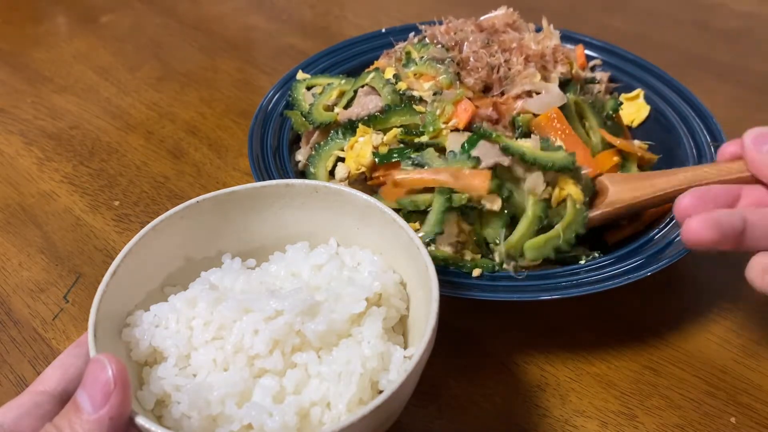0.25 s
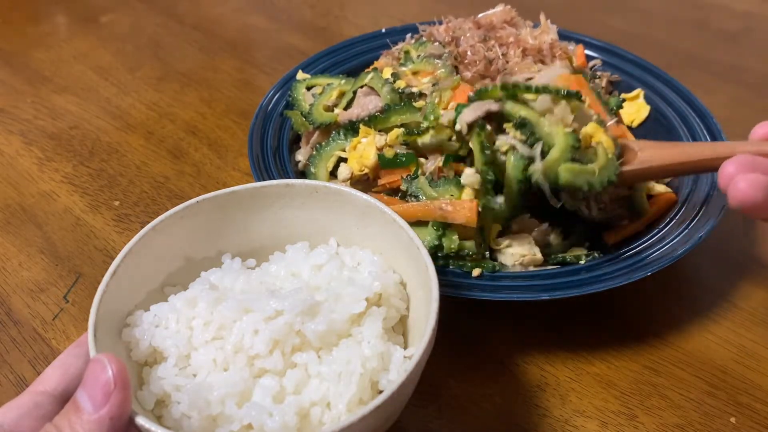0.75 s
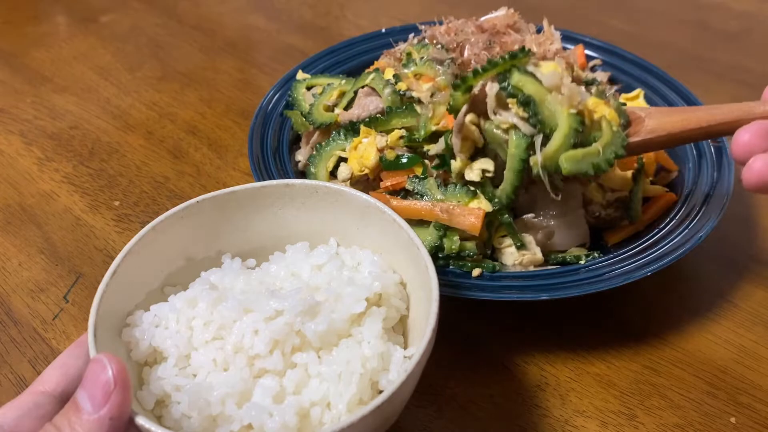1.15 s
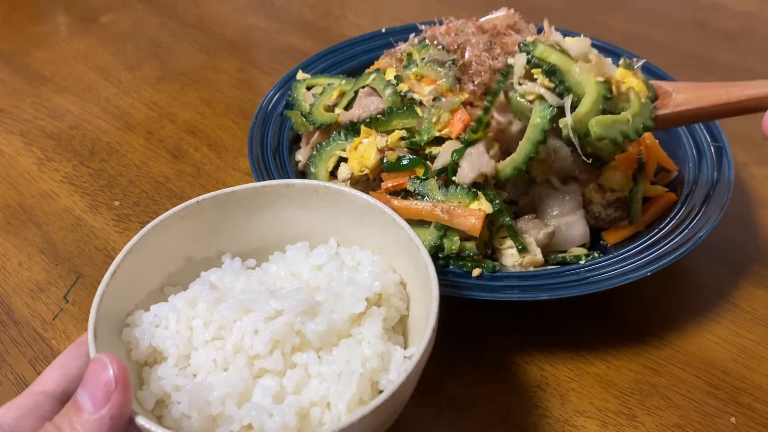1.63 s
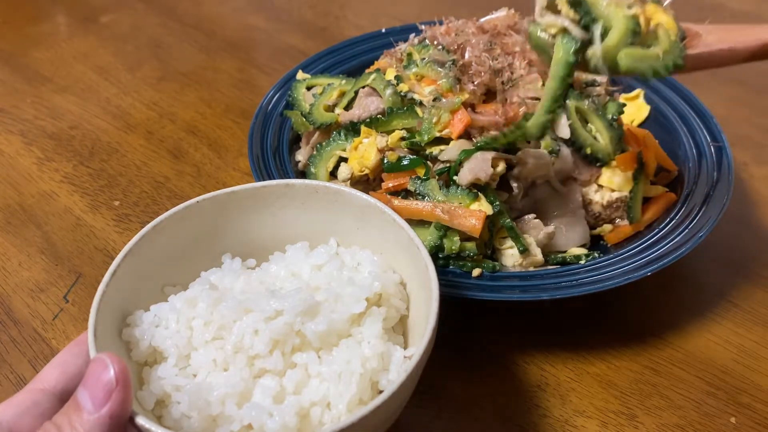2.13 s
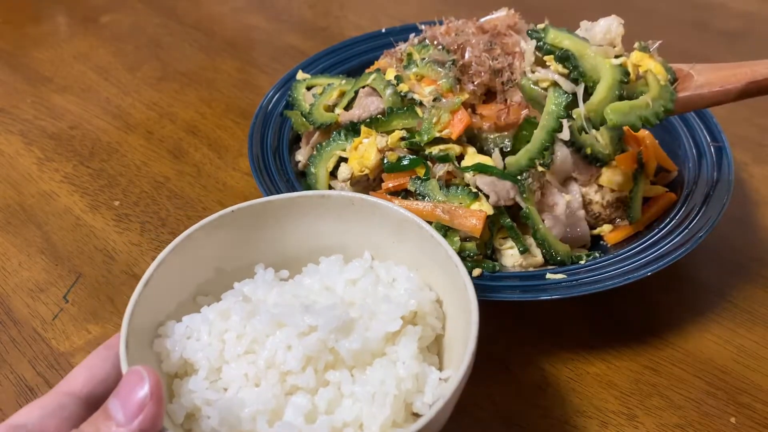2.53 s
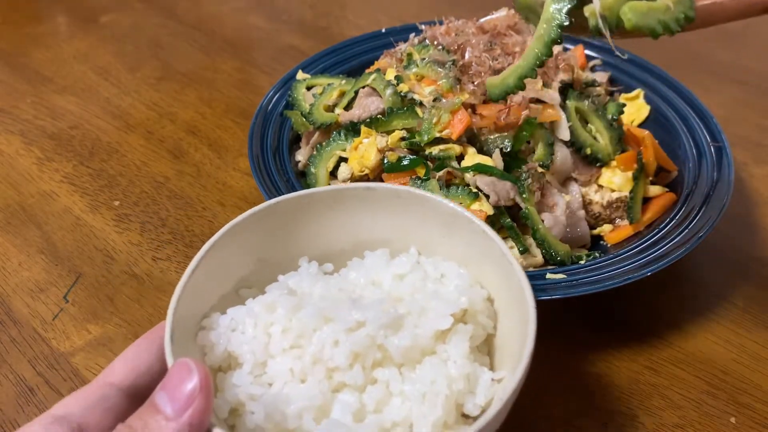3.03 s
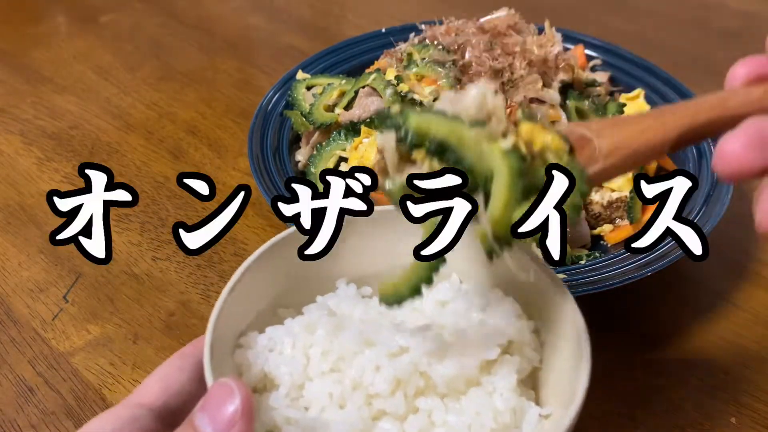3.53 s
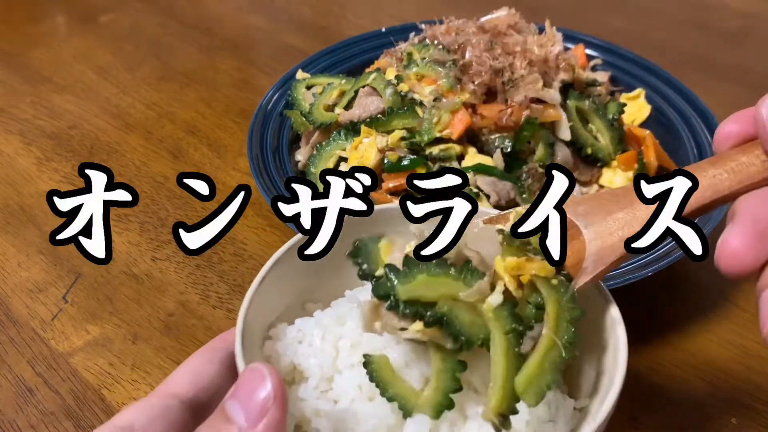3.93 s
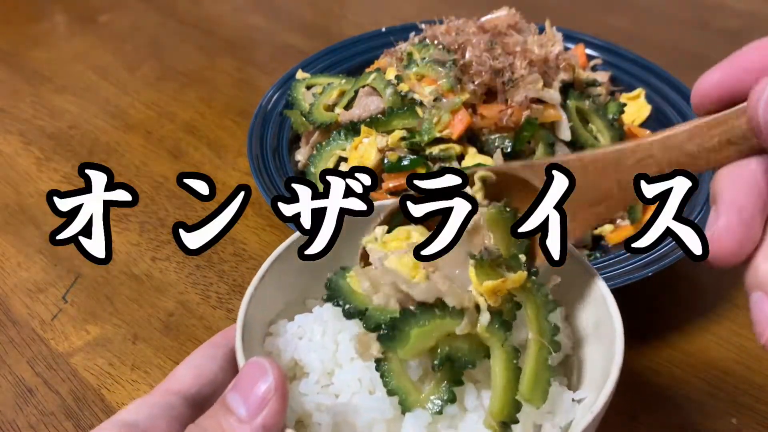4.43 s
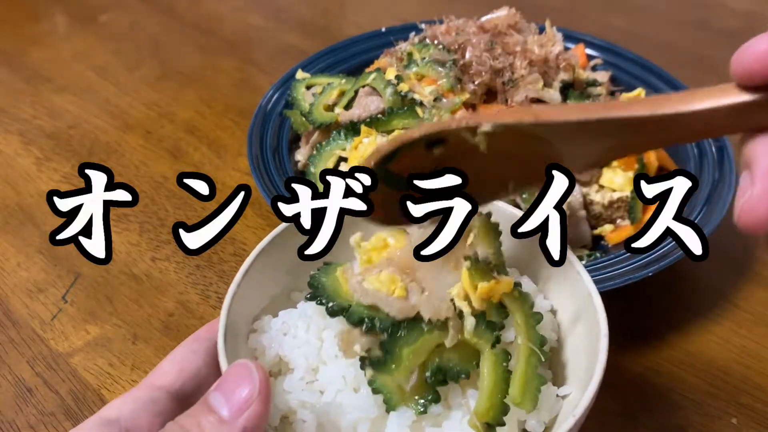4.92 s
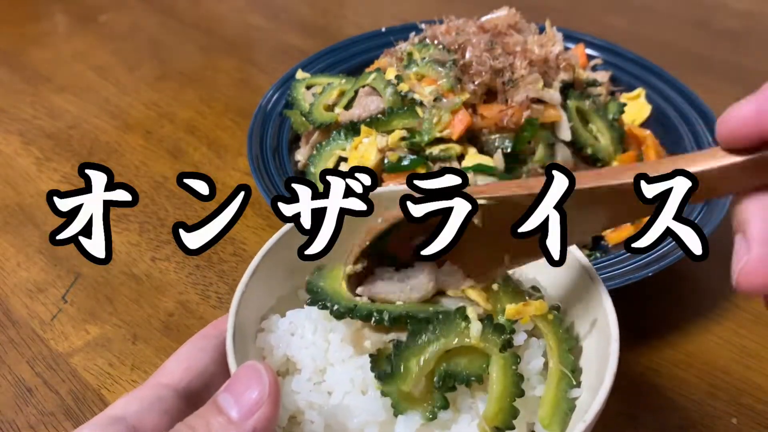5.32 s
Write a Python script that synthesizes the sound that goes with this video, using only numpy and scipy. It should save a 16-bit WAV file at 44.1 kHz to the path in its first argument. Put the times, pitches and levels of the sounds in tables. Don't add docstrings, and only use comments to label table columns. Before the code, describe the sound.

Close, quiet kitchen handling: tiny wet snaps, dull table thumps, a bowl foot dragging on wood, and one sharp ceramic knock.

```python
import sys
import numpy as np
from scipy import signal
from scipy.fft import rfft, irfft, next_fast_len
from scipy.io import wavfile

SR = 44100
rng = np.random.default_rng(int(sys.argv[2]) if len(sys.argv) > 2 else 0)


def dump(signal):
    limited = np.clip(np.atleast_2d(signal).T, -1, 1)
    pcm = np.round(limited * 32767).astype(np.int16)
    wavfile.write(sys.argv[1], SR, pcm)


def how_loud(loudness_db):
    steps = np.asarray(loudness_db, float) / 20
    return 10 ** steps


N = 245637

# (time [s], peak [dB], frequency [Hz], t60 [s], rise [s])
TABLE_THUMPS = [(0.09, -41, 88, 0.055, 0.0072), (0.158, -33, 120, 0.064, 0.013),
                (0.191, -37, 136.4, 0.096, 0.0087), (0.318, -44.5, 129.7, 0.19, 0.0037),
                (0.812, -36.5, 125.7, 0.21, 0.0022), (0.848, -39, 147, 0.047, 0.0038),
                (1.038, -43, 67.6, 0.15, 0.037), (1.3815, -36.5, 109.9, 0.21, 0.015),
                (1.39, -35.5, 76.7, 0.21, 0.027), (1.738, -47.5, 137.5, 0.088, 0.014),
                (2.097, -46.5, 124, 0.061, 0.0055), (2.213, -37.5, 87.5, 0.22, 0.011),
                (2.253, -33, 83, 0.15, 0.0037), (2.873, -39, 115, 0.068, 0.0049),
                (3.308, -44.5, 117, 0.085, 0.019), (4.105, -33.5, 135.8, 0.22, 0.0039),
                (4.649, -47.5, 68, 0.48, 0.021)]


def rms_one(x):
    return x / np.sqrt(np.mean(x ** 2) + 1e-20)


def in_time(rows):
    s, *columns = np.transpose(rows)
    return [np.interp(np.arange(N) / SR, s, c) for c in columns]


def at_hz(points, hz):
    table_hz, values = np.transpose(points)
    return np.interp(np.log(hz), np.log(table_hz), values)


def drift(rate):
    r = np.exp(-80 * np.pi * rate / SR)
    slow = signal.lfilter([1], [1, -2 * r, r * r], rng.standard_normal(N // 40 + 2002))[2000:]
    return np.interp(np.arange(N) / 40, np.arange(len(slow)), rms_one(slow))


def ring(drive, hz, t60):
    r = how_loud(-60 / (max(t60, 0.0005) * SR))
    w = 2 * np.pi * hz / SR
    return signal.lfilter([0, np.sin(w)], [1, -2 * r * np.cos(w), r * r], drive + 1e-18)


def band(x, low_hz, high_hz):
    return signal.sosfilt(signal.butter(2, [low_hz, high_hz], "band", fs=SR, output="sos"), x)


def sides(lean):
    return np.array([[1 + lean], [1 - lean]])


def pair(low_hz, high_hz, white):
    # (frequency [Hz], correlation [0-1])
    likeness = [(60, 0.98), (200, 0.85), (500, 0), (1500, 0.56), (3000, 0.4), (5500, 0.2), (7500, 0.94),
                (15000, 0.92)]
    mid, side = band(white, low_hz, high_hz)
    alike = np.clip(at_hz(likeness, np.sqrt(low_hz * high_hz)), 0, 1)
    return np.sqrt(1 + alike) * mid + np.sqrt(1 - alike) * side * [[1], [-1]]


def add(out, s, sound):
    i = round(s * SR)
    out[..., i:i + sound.shape[-1]] += sound[..., :N - i]


def room_tone(patchy_db):
    # (frequency [Hz], density [dB per Hz])
    air_spectrum = [(15, -40), (30, -7), (54, -2), (124, -4.5), (258, -22), (312, -15.5), (367, -25.5),
                    (617, -25.5), (711, -20), (859, -29), (1600, -38), (2600, -41.5), (2900, -51),
                    (7000, -51), (9100, -68), (15400, -120)]
    # (time [s], level [dB])
    ebb = [(0, 1.5), (.9, .6), (1.3, -1), (1.6, .3), (2, -1.5), (3.6, -1.5), (4.1, 0), (4.9, -2),
           (5.57, -2.5)]
    out = 0
    edges = 31 * 2 ** np.arange(0, 9, 0.5)
    white = rng.standard_normal((2, 2, N))
    slow_db = in_time(ebb)[0] + 0.3 * drift(0.11)
    for k, (low, high) in enumerate(zip(edges, edges[1:])):
        flicker_db = slow_db + patchy_db * drift(9)
        level_db = at_hz(air_spectrum, np.sqrt(low * high))
        out = out + how_loud(level_db + flicker_db) * pair(low, high, white[k % 2])
    whirr_hz, half_width_hz = 2690, 36
    whirr = rms_one(pair(whirr_hz - half_width_hz, whirr_hz + half_width_hz, white[0]))
    return how_loud(-58) * rms_one(out) + how_loud(-89) * whirr


def rumble():
    # (time [s], level [dB], creak above the deep shudder [dB])
    load = [(0.0, -54.5, 0.5), (0.22, -63.5, 1), (0.62, -66, 0), (.9, -61.5, 0.1), (1.25, -67.5, -4.5),
            (1.61, -64.5, 7), (1.77, -64, 6.5), (2.0, -59, -9), (2.28, -49, 2.2), (2.64, -70, 1.5),
            (2.96, -47, 6), (3.4, -58, -4.5), (3.6, -57, -0.5), (3.85, -67.5, 0.5), (4.69, -58.5, 0.8),
            (5.04, -73, -1), (5.23, -59.5, -5), (5.57, -65, 0.1)]
    load_db, creak_db = in_time(load)
    power = how_loud(2 * load_db)
    t = np.arange(SR // 2) / SR
    shudder_db, shudder_t60_s, shudder_rise_s = -10, 0.3, 0.012
    for s, peak_db, *_ in TABLE_THUMPS:
        fall = how_loud(2 * (peak_db + shudder_db - 60 * t / shudder_t60_s))
        add(power, s, fall * (1 - np.exp(-t / shudder_rise_s)) ** 4)
    white = rng.standard_normal((2, 2, N))
    deep = how_loud(-8.5 + 2.0 * drift(3.3)) * rms_one(pair(32, 80, white[0]))
    creak = rms_one(band(pair(89, 303, white[1]), 27, 330))
    return np.sqrt(power) * (deep + how_loud(-8.5 + creak_db + 4.67 * drift(5.7)) * creak)


def thumps():
    out, t = np.zeros((2, N)), np.arange(SR // 2) / SR
    for (s, peak_db, hz, t60, rise), turn in zip(TABLE_THUMPS, rng.random(len(TABLE_THUMPS))):
        shape = (1 - np.exp(-2 * t / rise)) ** 2 * how_loud(-60 * t / t60)
        low = np.sin(2 * np.pi * hz * t)
        upper = 0.36 * np.sin(2 * np.pi * (1.687 * hz * t + turn)) * how_loud(-300 * t)
        upper += 0.41 * np.sin(2 * np.pi * 1.7 * hz * t) * how_loud(-700 * t)
        lean = -0.16 * (hz > 112)
        add(out, s, how_loud(peak_db) * sides(lean) * shape / shape.max() * (low + upper))
    return out


def stirring():
    # (time [s], level [dB])
    unrest = [(0, -74), (.6, -83), (1.0, -84), (2.2, -87.5), (2.7, -83), (3.5, -83.5), (4.6, -87),
              (5.57, -89)]
    # (middle [s],
    # length [s], level [dB], brightness [-1 dull .. 1 bright])
    rustle_swells = [(0.083, 0.13, -62, -2.5), (0.36, 0.19, -81.5, -0.5), (0.551, 0.17, -78, 0.16),
                     (0.705, 0.096, -74, 0.41), (0.812, 0.16, -72.5, 0.25), (0.946, 0.079, -78.5, 0.2),
                     (1.18, 0.38, -77.5, 1.8), (1.288, 0.096, -74.5, 0.3), (1.42, 0.14, -73, -0.1),
                     (1.605, 0.085, -77.5, -0.1), (1.746, 0.092, -68.5, -0.47), (1.875, 0.22, -78, -0.1),
                     (2.075, 0.1, -79.5, -1.5), (2.367, 0.3, -76.5, -0.25), (2.757, 0.27, -79, 0.5),
                     (2.955, 0.2, -70.5, 0.21), (3.09, 0.12, -71.5, -0.2), (3.275, 0.14, -73, 0.059),
                     (3.616, 0.11, -81.5, -0.58), (4.12, 0.19, -77.5, 0.1), (4.274, 0.1, -74, 0.1),
                     (4.494, 0.23, -81.5, -0.35), (4.72, 0.13, -83.5, -0.8), (4.902, 0.07, -74.5, 0.6),
                     (5.322, 0.13, -82.5, 0), (5.437, 0.12, -78.5, 0.5)]
    bands = np.array([[-1], [0], [1]])
    colour_db = 5
    power = how_loud(2 * (in_time(unrest)[0] - colour_db * (bands - 0.032) ** 2))
    for s, length, level_db, bright in rustle_swells:
        swell = np.hanning(round(1.49 * length * SR))
        start = max(s - len(swell) / SR / 2, 0)
        add(power, start, (how_loud(level_db - colour_db * (bands - bright) ** 2) * swell) ** 2)
    return np.sqrt(power)


def rustle(grains_per_s, size_db):
    dull, bright, top = stirring()
    white = rng.standard_normal((2, 2, N))
    struck = rng.random(N) < grains_per_s / SR
    grains = struck * how_loud(size_db * np.minimum(rng.exponential(1, N), 5))
    white = white * (1 + grains)
    lower = how_loud(10.0) * dull * rms_one(pair(730, 3900, white[0]))
    lower = lower + bright * rms_one(pair(4400, 7800, white[1]))
    upper = rms_one(pair(8830, 10560, white[0])) + how_loud(-2.5) * rms_one(pair(11000, 13900, white[1]))
    return how_loud(-7.5 + 2.0 * drift(46)) * lower + how_loud(-2.5 + 2.3 * drift(22)) * top * upper


def clicks():
    # (time [s], peak [dB], frequency [Hz], overtone [dB])
    wet_snaps = [(0.0094, -50, 9670, -23), (0.075, -58, 14700, -5), (0.107, -49.5, 5060, -19),
                 (0.3262, -55, 7840, -18), (0.3357, -52, 7660, -12), (0.3844, -60, 4700, -6),
                 (0.4062, -58, 12200, -9), (0.4584, -57, 15000, -5), (0.5127, -59, 9780, 3),
                 (0.6564, -53, 10600, -20), (0.7043, -58.5, 4900, -8), (0.7508, -45, 9500, -12),
                 (0.776, -46, 9700, -18), (0.787, -48, 6500, -11), (0.8096, -64, 11500, 2),
                 (0.861, -50.5, 8700, -14), (1.141, -38.5, 10970, -5), (1.2546, -63, 5430, -2),
                 (1.3675, -57, 5330, 1), (1.716, -48, 4730, -14), (2.069, -82, 4400, -16),
                 (2.7344, -70, 11200, -3), (2.9038, -59, 4510, -7), (4.457, -67, 7500, 4),
                 (4.869, -79, 11000, -2), (4.888, -57, 9600, -5), (5.359, -58, 11500, -2)]
    out, t = np.zeros(N), np.arange(SR // 25) / SR
    impulse = 1. * (t == 0)
    for s, peak_db, hz, overtone_db in wet_snaps:
        edges = 0.65 * hz, min(1.6 * hz, 0.45 * SR)
        t60 = np.interp(hz, (4500, 9000), (0.0045, 0.0041))
        spit = band(rng.standard_normal(len(t)), *edges)
        spit = spit * (0.5 * how_loud(-60 * t / t60) + how_loud(-30 - 1300 * t))
        snap = ring(impulse, hz, t60) + how_loud(overtone_db) * ring(impulse, min(1.36 * hz, 0.4 * SR), t60)
        add(out, s, how_loud(peak_db - 1) * band(snap + spit, *edges))
    return out


def pings():
    # (time [s], peak [dB], frequency [Hz], t60 [s])
    lone_rings = [(1.368, -50.5, 2700, 0.017), (1.369, -58, 4300, 0.008), (2.404, -65, 3050, 0.16),
                  (2.405, -71, 3960, 0.066), (2.405, -38, 1060, 0.045), (2.628, -57.5, 1050, 0.065),
                  (2.629, -53, 456, 0.13), (2.735, -71, 4230, 0.098), (2.735, -66.5, 3060, .05),
                  (2.78, -74, 4050, 0.12), (2.904, -65, 3130, 0.066), (2.933, -67, 4200, 0.23),
                  (2.949, -62, 3090, 0.09), (2.98, -74, 2500, .03), (3.01, -73, 2060, 0.11),
                  (3.041, -71, 1700, 0.05), (3.069, -68, 3060, 0.12), (3.08, -75, 4260, .08),
                  (3.298, -42, 1120, 0.018), (3.298, -71, 4380, 0.053), (3.304, -69, 3790, 0.09),
                  (3.302, -77, 3220, 0.036), (3.306, -46, 1130, 0.019), (3.313, -38.5, 1080, 0.02),
                  (3.315, -53.5, 2150, 0.051), (4.092, -22.5, 1130, 0.015), (4.1, -31, 1709, 0.048),
                  (4.119, -46, 1590, 0.027)]
    out, t = np.zeros((2, N)), np.arange(SR // 5) / SR
    for s, peak_db, hz, t60 in lone_rings:
        rattle = rng.standard_normal(len(t)) * np.exp(-t / (0.043 * t60))
        mode = ring(rattle, hz, t60)
        add(out, s, how_loud(peak_db) * sides(0.11) * mode / np.abs(mode).max())
    return out


def swells():
    # (time [s], peak [dB], frequency [Hz], t60 [s], rise [s])
    sung_modes = [(1.37, -64, 3400, .008, .001), (1.371, -54, 1880, .015, .002),
                  (1.374, -59, 1255, 0.017, 0.0017), (2.316, -60, 2150, .02, .002),
                  (2.632, -57.5, 420.5, .3, 0.009), (2.82, -54.5, 413, 0.27, .01),
                  (2.934, -67, 1870, .012, .001), (2.934, -48, 1263, 0.068, 0.0029),
                  (2.964, -41.5, 423.3, 0.12, 0.047), (2.977, -62, 2300, .01, .001),
                  (2.98, -73, 3055, 0.28, 0.016), (3.02, -72.5, 3055, 0.25, 0.017),
                  (3.05, -73, 3055, 0.12, 0.0092), (3.016, -33, 421.6, 0.086, 0.0098),
                  (3.068, -66, 2050, 0.014, 0.0018), (3.068, -40.5, 420.4, 0.072, 0.01),
                  (3.1, -47, 418.7, .055, .04), (3.321, -62, 1668, .04, .004),
                  (3.3, -38, 423.6, 0.12, 0.011), (3.302, -49, 1088, 0.16, .006),
                  (3.312, -50.5, 1232, 0.14, 0.005), (3.303, -65, 4000, 0.044, .004),
                  (3.299, -66, 3170, .03, .002), (2.405, -41.5, 424.5, 0.084, .004),
                  (2.44, -58.5, 1066, .12, .012), (3.335, -58, 1068, 0.062, .01),
                  (4.0895, -53, 4290, .03, .002), (4.0915, -51, 6030, 0.021, .002),
                  (4.092, -52, 3300, .022, .002), (4.092, -70, 7400, .02, .002),
                  (4.093, -60, 3050, 0.093, .002), (4.1, -41, 1606, 0.036, 0.0035),
                  (4.105, -71, 7200, 0.013, .002)]
    out, t = np.zeros((2, N)), np.arange(SR // 3) / SR
    for s, peak_db, hz, t60, rise in sung_modes:
        shape = (1 - np.exp(-t / rise)) ** 2 * how_loud(-60 * t / t60)
        tone = np.sin(2 * np.pi * hz * (t + round(s * SR) / SR))
        lean = -0.05 if hz < 700 else 0.15
        add(out, s, how_loud(peak_db) * sides(lean) * shape / shape.max() * tone)
    return out


def drags(grains_per_s, size_db):
    # (time [s], level [dB])
    pushes = [
        [(2.211, -59), (2.25, -58), (2.3, -52), (2.4, -52.5), (2.426, -53), (2.55, -89)],
        [(2.63, -74), (2.662, -68.5), (2.735, -66.5)],
        [(2.735, -63), (2.76, -63.5), (2.815, -60.5)],
        [(2.815, -59), (2.85, -61), (2.9, -58.5)],
        [(2.9, -44.5), (2.936, -44.5), (2.97, -51)],
        [(2.97, -45.5), (3.01, -48), (3.03, -49), (3.066, -55.5), (3.08, -50.5), (3.13, -61.5), (3.15, -76)],
    ]
    # (glaze [dB], hollow second mode [dB], grit [dB])
    colours = [(-1, -7.5, -1.5), (0, 11.5, -0.5), (9, 9, -31), (8, 7, -5), (5.5, 2.5, -21), (2.5, 4, -15)]
    foot_levels = [-3.5, -18, -27, -15, -29, -27]
    # (frequency [Hz], level [dB], t60 [s], lean to the left)
    rubbed = [(326, -5, 0.11, 0.055), (410.7, 2, 0.077, -0.21), (590, -2, 0.038, 0.2),
              (785, -8, 0.082, -1.1), (990, -4, 0.078, -0.36), (1081, -5.5, 0.086, 0.29),
              (1232, -7.5, 0.054, -0.1), (1590, -23.5, 0.16, 0.73), (2040, -23.5, 0.11, 0.85),
              (3055, -26, 0.14, -0.38), (4230, -28.5, 0.15, 0.013), (4510, -34, 0.09, -0.17),
              (8050, -37, 0.069, 0)]
    # (frequency [Hz], level [dB], t60 [s], lean to the left)
    rim = [(517, 3.5, 0.077, .1), (1604, -9, 0.083, .2), (2150, -24, 0.081, 0.34), (2520, -17, 0.062, 0.26)]
    out, tail = np.zeros((2, N)), SR // 4
    for rows, (glaze_db, hollow_db, grit_db), foot_db in zip(pushes, colours, foot_levels):
        start, stop = round(rows[0][0] * SR), round(rows[-1][0] * SR)
        luck = rng.random((2, SR))[:, :stop - start + tail]
        length = luck.shape[1]
        slips = rng.standard_normal((2, SR))[:, :length] * (luck[0] < grains_per_s / SR)
        slips = rms_one(slips * how_loud(size_db * np.minimum(-np.log(luck[1]), 3)))
        pressure = how_loud(in_time(rows)[0][start:stop + tail] - 6.5)
        slips *= pressure * (np.arange(length) < stop - start)
        extra_db = [0, hollow_db] + [0] * (len(rubbed) - 6) + [glaze_db] * 4 + [foot_db] * len(rim)
        modes = 0
        for k, (hz, db, t60, lean) in enumerate(rubbed + rim):
            mode = ring(slips[k % 2] * how_loud(db + extra_db[k]), hz, t60)
            modes = modes + mode * sides(lean) / np.sqrt(t60 * SR / 28)
        grit = how_loud(19.5) * pair(386, 760, slips)
        grit += how_loud(4.5) * pair(1260, 2500, slips[::-1])
        grit += how_loud(-20.0) * pair(4100, 13500, slips)
        out[:, start:stop + tail] += modes + how_loud(grit_db) * grit
    return out


def knocks():
    # (time [s], peak [dB], brightness [dB per octave], ring-time factor, thud [dB])
    hits = [(.816, -52, -7.5, 0.65, -8), (1.369, -38, -1.5, 0.36, 3.5), (1.374, -47.5, 2.5, 0.42, 4),
            (1.718, -53.5, -2, 0.45, 1.5), (2.211, -59, -19, 0.57, 0), (2.238, -63, 12.5, 0.32, -10),
            (2.275, -62, 12.5, 0.7, -14), (2.322, -51, 8.5, 0.35, -9), (2.405, -33, 0, 0.43, -3.5),
            (2.627, -56.5, -5, 1.9, -27), (2.735, -78, 14, 0.6, -16), (2.816, -53, -7, 0.91, -15),
            (2.866, -52, -9, 1.1, -10), (2.904, -59, -3, 0.59, -4), (2.933, -45.5, 4.5, 0.91, 0),
            (2.978, -65, 2, .6, -5), (3.02, -50, -8, 0.61, -7), (3.069, -42, -1.5, 0.57, 5.5),
            (3.078, -42, -7, 0.24, -5), (3.297, -34, 0, 0.95, -3), (3.304, -42, 2, 0.85, 3),
            (3.315, -41.5, 5, 0.53, 1), (3.479, -72, 14, 0.6, 8), (4.092, -22, 4.5, 0.9, -8),
            (4.099, -31.5, 1, 0.62, 1)]
    body_hz = [324, 421.5, 577, 617, 815, 930, 1089, 1228, 1530, 1645, 1700, 1802, 2260, 2700]
    # (level [dB], t60 [s], lean to the left)
    body = [(6, 0.16, -0.17), (6.5, 0.13, -0.071), (-3.5, 0.14, -0.26), (-8.5, 0.27, -1.1),
            (-23, 0.1, 0.67), (-17, 0.13, 1), (-3.5, 0.091, -0.1), (-8.5, 0.11, -0.034),
            (-11.5, 0.052, -0.035), (-13.5, 0.15, -0.41), (-29, 0.12, 0.015), (-37, 0.11, 0.15),
            (-11, 0.026, 0.57), (-42, 0.069, 0.71)]
    # (frequency [Hz], level [dB], t60 [s], lean to the left)
    glaze = [(3047, -38, 0.09, 0.065), (3895, -41, 0.09, 0.12), (4215, -33, 0.065, 0),
             (5450, -50, 0.03, 0.15), (5930, -40, 0.03, .1), (7440, -54, 0.047, 0.15),
             (8900, -40, 0.019, 0.038), (10800, -37, 0.035, .05), (12400, -46, 0.027, .05)]
    modes = [(hz, *row) for hz, row in zip(body_hz, body)] + glaze
    out, t = np.zeros((2, N)), np.arange(SR // 3) / SR
    luck = rng.normal(0, 1, (len(hits), len(modes)))
    for (s, peak_db, bright_db, ring_time, thud_db), spread_db in zip(hits, luck):
        hard = peak_db > -25
        contact_s, first_touch, cut_hz = (0.0002, 1, 14000) if hard else (0.006, 0.3, 1850)
        rattle = rng.standard_normal(len(t)) * np.exp(-t / contact_s)
        contact = 0.5 * rattle / np.linalg.norm(rattle) + (t == 0) * first_touch
        ringing = 0
        for k, (hz, level_db, t60, lean) in enumerate(modes):
            mode = ring(contact, hz, t60 * ring_time) * (1 - (hz < 700) * np.exp(-t * hz / 0.98))
            gain = how_loud(level_db + spread_db[k] + bright_db * np.log2(hz / 500)) / np.abs(mode).max()
            sense = (-1) ** (k * (hz < 900))
            ringing = ringing + sense * gain * sides(lean) * mode
        swell = 1 - np.exp(-t / contact_s)
        mid, side = band(band(rng.standard_normal((2, len(t))), 340, 1530), 280, 1560)
        thud = sides(0.14) * mid + 0.57 * side * [[1], [-1]]
        thud *= swell * (how_loud(-600 * t / ring_time) + how_loud(-19 - 150 * t))
        crack_db = -38 if hard else -55.5 + bright_db
        crack = band(rng.standard_normal(len(t)), 2500, 13000) * how_loud(crack_db - 4000 * t)
        scatter = pair(1700, 4400, rng.standard_normal((2, len(t))))
        scatter = scatter * swell * how_loud(-36 + bright_db - 190 * t)
        whole = ringing + how_loud(thud_db + 15.5) * thud + crack + scatter
        add(out, s, how_loud(peak_db - 9.0) * band(whole, 200, cut_hz))
    return out


def kitchen(x):
    t60_s, wall_cut_hz = 0.26, 3850
    out, dull = np.zeros((2, N)), np.exp(-2 * np.pi * wall_cut_hz / SR)
    for k, lag in enumerate((rng.uniform(0.0065, 0.03, 16) * SR).astype(int)):
        loop, gain, state = x.copy(), how_loud(-60 * lag / SR / t60_s), [0.]
        for i in range(lag, N, lag):
            back, state = signal.lfilter([gain * (1 - dull)], [1, -dull], loop[i - lag:i], zi=state)
            loop[i:i + lag] += back[:N - i]
        out[k % 2] += (loop - x) * (-1) ** (k // 2)
    return out


def scene():
    bowl = knocks() + pings() + swells() + drags(grains_per_s=8300, size_db=2.0)
    food = clicks()
    near = bowl + food + thumps() + rumble() + rustle(grains_per_s=450, size_db=-24.0)
    air = room_tone(patchy_db=1.3)
    echo = kitchen(band(bowl.mean(axis=0) + food, 405, 8500))
    return near + how_loud(-16.5) * echo + air


def low_pass(x):
    return signal.sosfilt(signal.butter(12, 16800, fs=SR, output="sos"), x)


def record(dry):
    # (frequency [Hz], phase [turns])
    side_turns = [(0, 0), (7350, 0), (9000, .5), (11200, 1), (11550, 1.03), (13250, 1.5), (13800, 1.53),
                  (14700, 2), (22050, 2)]
    # (frequency [Hz], left minus right [dB])
    left_lift = [(100, -0.5), (1500, 2.5), (3000, 2.5), (5500, 4), (7000, 0), (15000, -0.5)]
    size = next_fast_len(N + 4096)
    hz = np.arange(size // 2 + 1) * SR / size
    turns = np.interp(hz, *np.transpose(side_turns))
    low_cut = 1 / np.sqrt(1 + (35 / (hz + 1)) ** 8)
    half = how_loud(at_hz(left_lift, hz + 1) / 2) * np.exp(-1j * np.pi * turns)
    both_sides = irfft(rfft(dry, size) * low_cut * [half, 1 / half], size)[:, :N]
    mix = signal.sosfilt(signal.cheby2(10, 50, 17200, fs=SR, output="sos"), both_sides)
    return low_pass(mix)


dry = scene()
out = record(dry)
dump(out)
```